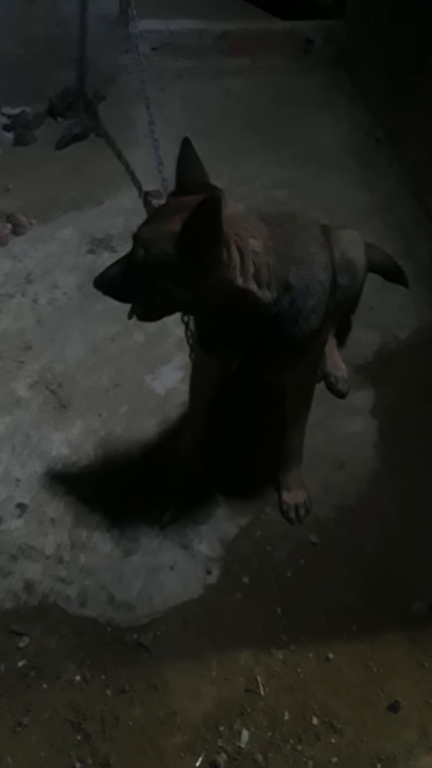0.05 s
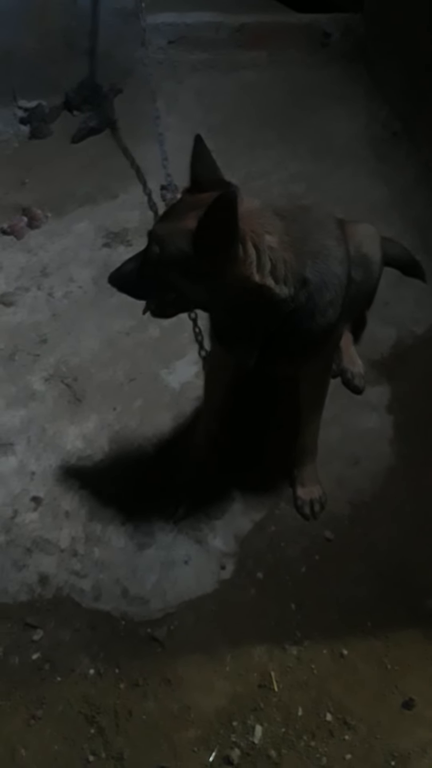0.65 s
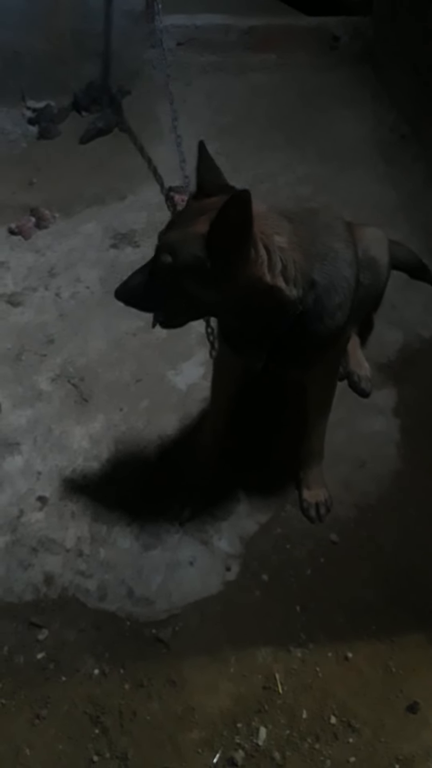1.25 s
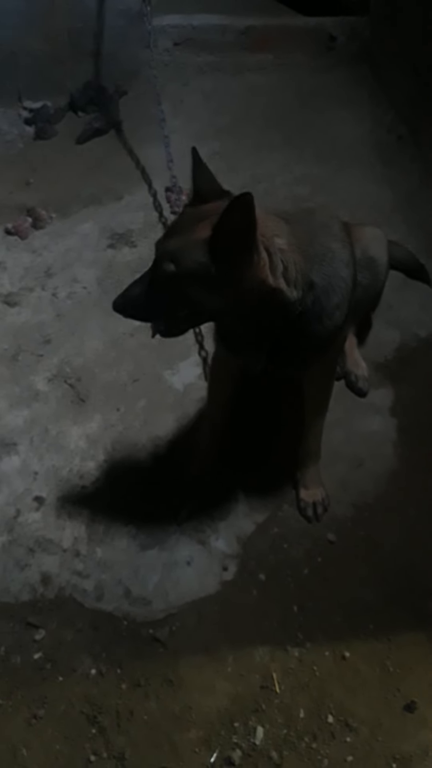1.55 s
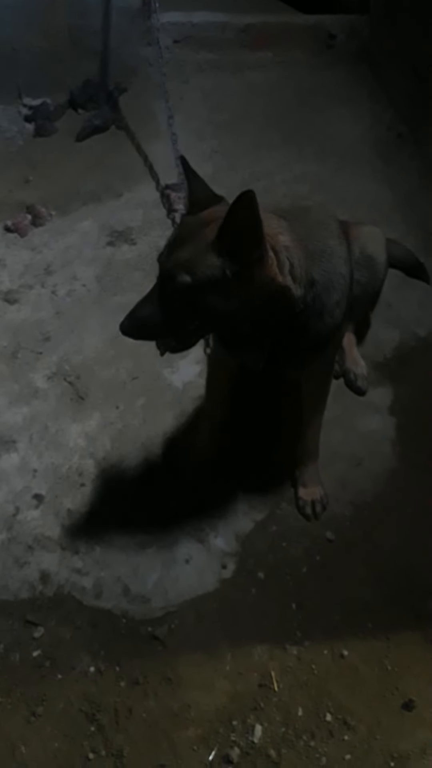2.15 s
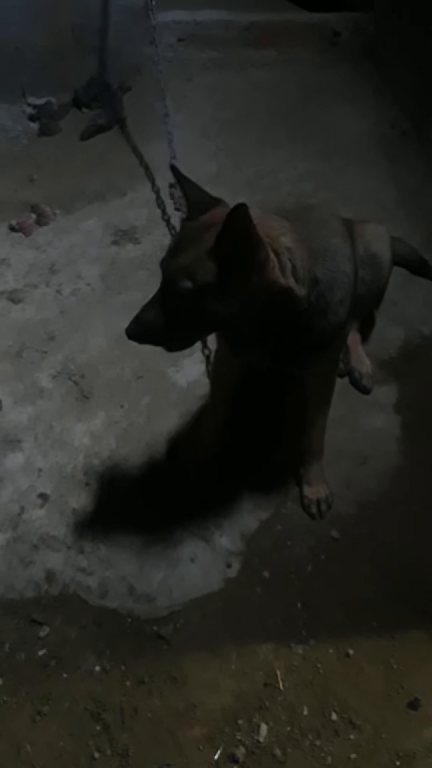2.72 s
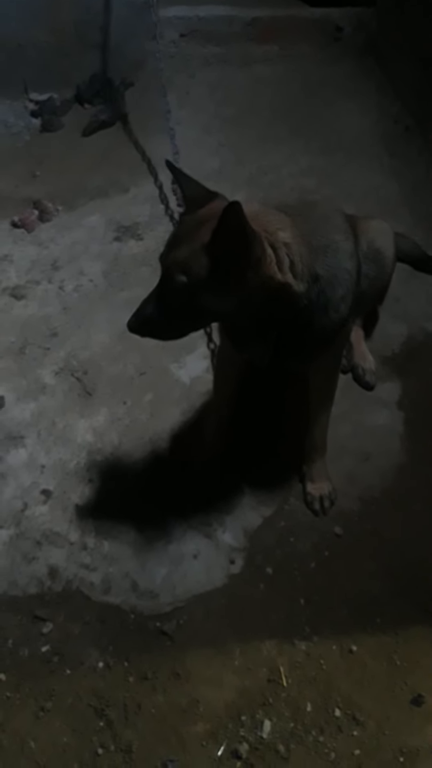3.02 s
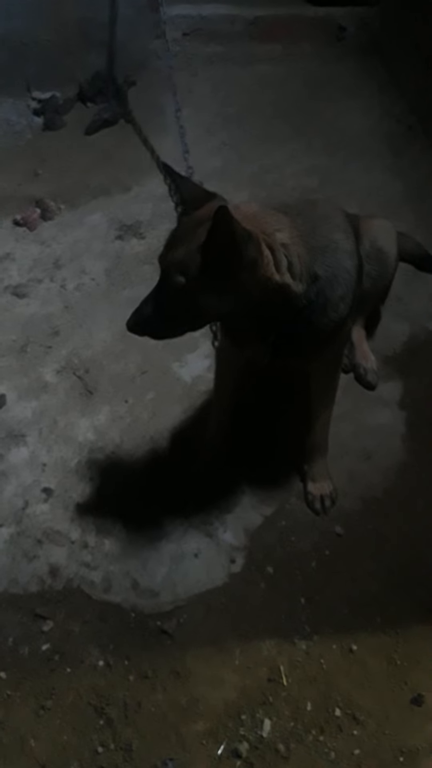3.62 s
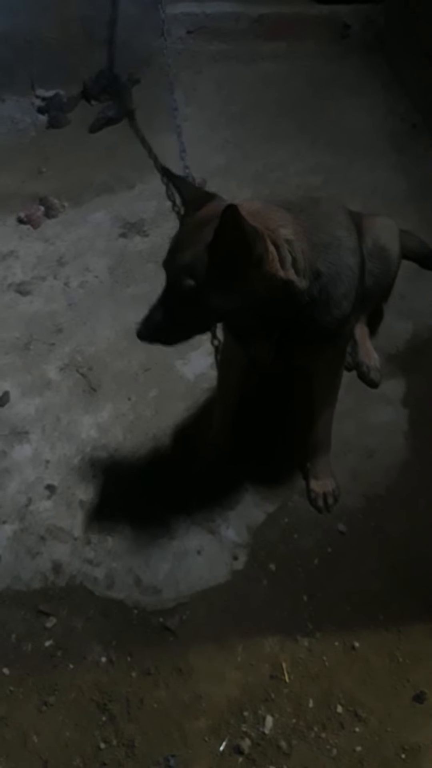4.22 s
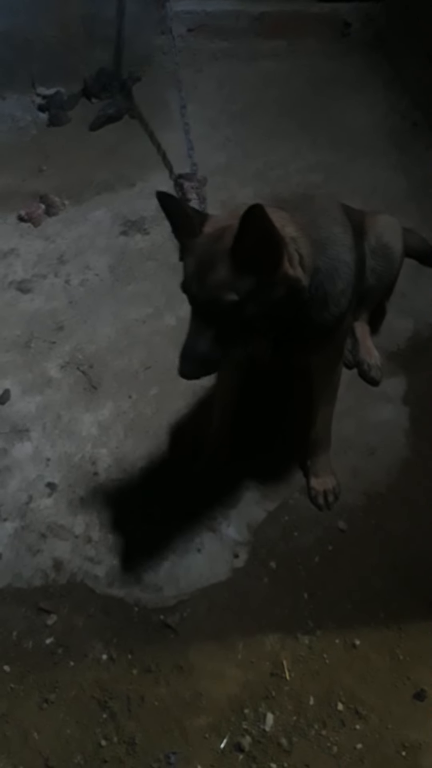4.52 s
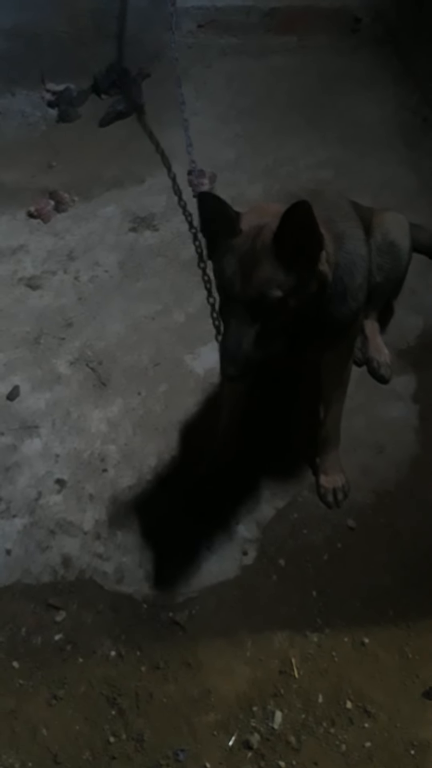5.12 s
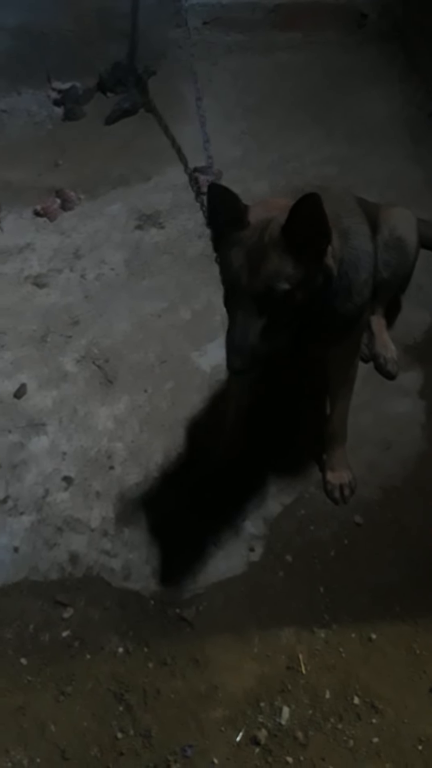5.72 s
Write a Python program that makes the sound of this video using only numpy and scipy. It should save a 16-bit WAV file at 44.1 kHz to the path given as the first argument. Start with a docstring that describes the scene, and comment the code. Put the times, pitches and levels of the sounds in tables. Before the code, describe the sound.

Six loud, hoarse dog barks mixed with low growls and snarls, then a light chain rattle and rustle, outdoors in still air.

```python
"""A chained dog barks twice, close by, in a walled yard at night; it pants softly and something rustles.
It growls with its mouth closed, then gives two more pairs of barks, each trailing into a snarl.
The voice is pulses of air from the vocal folds, shaped by the resonances of throat and mouth.
As the dog turns its head the chain clinks, the rustle returns with dry ticks, and a last growl rises.
Throughout, the walls reverberate briefly and a few hollow notes linger over still air."""
import sys
import numpy as np
from scipy import signal
from scipy.fft import rfft, irfft, next_fast_len
from scipy.io import wavfile
from scipy.ndimage import uniform_filter1d, minimum_filter1d, map_coordinates

SR = 44100
rng = np.random.default_rng(int(sys.argv[2]) if len(sys.argv) > 2 else 0)


def to_wav(sig):
    """Store sig (one row per channel, or 1-D mono) as 16-bit WAV at the path in sys.argv[1].

    Samples outside -1..1 are clipped; the rate is SR.
    """
    pcm = np.clip(np.atleast_2d(sig), -1, 1) * 32767
    pcm = np.round(pcm).astype(np.int16)
    wavfile.write(sys.argv[1], SR, pcm.T)  # frames by channels


N = 254456
TIME = np.arange(N) / SR

# The hoarse body of a bark. Each row: frequency in Hz, relative level in dB.
HOARSE_SPECTRUM = [(120, -44.5), (250, -28), (340, -2.5), (450, 3.5), (620, 2.5), (760, -9.5), (1100, -33),
                   (2000, -65.5)]
# The barks. Each row: time of full voice, attack, hold and release in seconds; top pitch in Hz; delay of
# that top, half width of the pitch arch and delay of the widest jaw in seconds; levels of fundamental,
# body, throat, mouth and hiss in dB; hiss treble and whistle in dB relative to the hiss; chest level
# in dB; roughness from 0 to 1; frequency factors of the throat and of the mouth.
BARK_EVENTS = [ (0.018, 0.044, 0.049, .115, 507.3, 0.026, .085, 0.058, -10.5, -19, -17, -17.5, -38.5, -3, -2.5, -45.5, 0.5, 1.032, 0.89),
               (0.612, 0.041, 0.042, .11, 592.4, .02, .042, 0.058, -14.5, -19, -14.5, -12, -33.5, 4, -11, -40.5, 0.82, 1.014, 0.92),
               (2.619, .05, 0.071, .1, 554.8, .042, 0.068, .06, -7.5, -15, -15, -13.5, -31, -0.5, -12, -38.5, 0.96, 1.072, 1),
               (2.882, .066, 0.055, .092, 593, .055, .058, .06, -10, -19, -16.5, -15.5, -30.5, -2.5, -5, -42, 0.9, 1.03, 0.94),
               (3.747, .036, 0.074, .088, 519.5, .055, .085, .054, -9, -22.5, -16.5, -16.5, -34, 3.5, -16, -42, 0.97, 1.015, 0.96),
               (4.081, 0.099, 0.024, 0.094, 515.8, .03, .04, 0.054, -26, -21.5, -21, -21.5, -42.5, -1.5, 2.5, -42, 0.81, 1.053, 0.98),
               ]
def barks():
    """Source and filter: the folds sound an arching pitch; effort and jaw opening weight each layer."""
    out = np.zeros(N)
    slack_hz, jaw_swing_s, hiss_lag_s, tone_fade_db_per_s = 417.9, .06, .0097, 34
    # for fundamental, body, throat, mouth and hiss: dB per dB of effort, and dB lost with the jaw shut
    slopes, losses_db = (1, .65, 1.2, 1, .95), (.5, .58, 1.7, 13, 16)
    for start, attack, hold, release, top_hz, crest, arch, widest, *voice in BARK_EVENTS:
        *peaks_db, treble_db, whistle_db, _, rough, throat_shift, mouth_shift = voice
        at, t, effort_db = swell(start, attack, hold, release)
        pitch = slack_hz + (top_hz - slack_hz) * np.exp(-np.abs((t - crest) / arch) ** 2.8)
        jaw_t = t - widest
        shut = 1 - .5 ** ((jaw_t / jaw_swing_s) ** 2)
        tone_db, body_db, throat_db, mouth_db, hiss_db = (
            db + slope * effort_db - loss * shut for db, slope, loss in zip(peaks_db, slopes, losses_db))
        tone_db -= tone_fade_db_per_s * np.maximum(t, 0)  # the clean tone gives way to hoarseness
        hiss_db = np.interp(t - hiss_lag_s, t, hiss_db)
        turns = cycles(pitch, jitter=.02, rate=240)
        out[at] += amp(tone_db) * fundamental(turns, flutter_db=3, rate=110)
        breath = folds(turns, rough=1, scatter_db=-.5, limp=0)
        out[at] += amp(body_db) * coloured(breath, HOARSE_SPECTRUM)
        out[at] += vocal_tract(turns, pitch, jaw_t, rough, (throat_shift, mouth_shift), (throat_db, mouth_db))
        out[at] += amp(hiss_db) * teeth_hiss(turns, jaw_t, throat_shift, hiss_db, treble_db, whistle_db)
    return out


# Resonances of throat and mouth in a bark. Each row: frequency in Hz, relative level in dB.
THROAT_FORMANTS = [(200, -49.5), (400, -15), (630, -8), (850, 5), (1040, -3.5), (1180, -15), (1500, -26.5),
                   (3000, -75.5)]
MOUTH_FORMANTS = [(600, -48.5), (1100, -12.5), (1270, -6.5), (1400, 3), (1700, 1), (1950, -1.5),
                  (2120, -17), (2360, -24.5), (2650, -35), (3050, -29), (3700, -40.5), (6000, -72)]
def vocal_tract(turns, pitch, jaw_t, rough, shifts, levels_db):
    """Formant filtering: throat and mouth shape clean overtones and air chopped by flapping tissue."""
    chopped = folds(turns, rough=.82, scatter_db=5.5, limp=.87) * amp(.69 * wobble(len(turns), 170))
    source = smeared(chopped, t60=.11, direct=.6)
    out = 0
    for formants, shift, db in zip((THROAT_FORMANTS, MOUTH_FORMANTS), shifts, levels_db):
        cavity = np.multiply(formants, [shift, 1])
        clear = overtones(turns, pitch, range(2, 5), cavity, flutter_db=7, rate=130)
        torn = sinking(source, cavity, jaw_t)
        out += amp(db) * (np.sqrt(rough) * torn + np.sqrt(1 - rough) * clear)
    return out


# Air rushing past the teeth. Each row: frequency in Hz, relative level in dB.
TEETH_SPECTRUM = [(2800, -45.5), (3750, -20.5), (4250, -0.5), (4800, 1), (5350, -5.5), (6000, -10.5),
                  (7400, -23.5), (9000, -38), (10500, -47.5), (15500, -45.5)]
def teeth_hiss(turns, jaw_t, shift, flow_db, treble_db, whistle_db):
    """Turbulence at the teeth: a hiss, brightest at the strongest flow, and an airy falling whistle."""
    n = len(turns)
    whistle_hz, sag_hz_per_s = 4880, 6000
    air = smeared(folds(turns, rough=.87, scatter_db=4.5, limp=.26), t60=.02, direct=.13)
    hiss = unit(coloured(air, np.multiply(TEETH_SPECTRUM, [shift, 1])) * amp(1.3 * wobble(n, 150)))
    dull = signal.sosfiltfilt(signal.butter(3, 6300, fs=SR, output="sos"), hiss)
    treble = amp(treble_db + .56 * (flow_db - flow_db.max())) * (hiss - dull)
    whistle = np.sin(2 * np.pi * cycles(whistle_hz - sag_hz_per_s * jaw_t, jitter=.042, rate=700))
    return dull + treble + amp(whistle_db) * unit(whistle * wobble(n, 300))


# The resonance of the chest. Each row: frequency in Hz, relative level in dB.
CHEST_SPECTRUM = [(30, -47.5), (75, -38.5), (110, -11.5), (160, -3.5), (230, -1), (330, -17), (700, -66)]
def chest():
    """Forced vibration: the chest shudders as each bark starts and ends, less under the full voice."""
    out = np.zeros(N)
    pitch_hz, edge_s, depth_db = 139.9, .04, 9.5
    for start, attack, hold, release, *_, db, _, _, _ in BARK_EVENTS:
        length = attack + hold + .88 * release
        at, t, edge_db = swell(start - attack, edge_s, length, edge_s)
        dip_db = depth_db * np.sin(np.pi * np.clip(t / length, 0, 1)) ** 2
        turns = cycles(np.full(len(at), pitch_hz), jitter=.14, rate=37)
        pulses = folds(turns, rough=.1, scatter_db=5, limp=.15)
        out[at] += amp(db + edge_db - dip_db) * coloured(pulses, CHEST_SPECTRUM)
    return out


# A snarl's clear overtones and its torn buzz. Each row: frequency in Hz, relative level in dB.
SNARL_HARMONICS = [(150, 25.5), (240, 2.5), (320, 3), (410, 4), (500, -3), (590, -11), (720, -1),
                   (820, -20), (930, -14), (1200, -38)]
SNARL_FORMANTS = [(90, -44.5), (160, 10.5), (250, -7.5), (420, 12), (590, -7), (720, -9), (930, -14),
                  (1250, -18), (1600, -14), (2150, -31), (2700, -37), (3800, -46.5), (4600, -29.5),
                  (5250, -30.5), (6000, -45), (9000, -59.5)]
# Open-mouth growls, one list each. Each row: time in seconds, pitch in Hz, relative levels of chest
# and throat in dB.
SNARL_PATHS = [
    [(3.02, 174.8, -47.5, -26.5), (3.048, 164.8, -36, -32), (3.09, 133.3, -42, -35),
     (3.168, 139.9, -44, -33.5), (3.244, 131.7, -44, -37.5), (3.302, 126.1, -56, -39),
     (3.35, 118.2, -51, -42), (3.385, 121.5, -66, -51.5)],
    [(4.2, 123.7, -70, -53), (4.24, 122.6, -73, -39.5), (4.38, 127.0, -59, -42.5),
     (4.46, 119.1, -59, -46.5), (4.796, 109.6, -57, -48.5), (4.928, 109.4, -61, -53.5),
     (4.96, 107, -52, -45.5), (5.03, 96.4, -79, -60)],
]
def snarls():
    """Irregular fold vibration: the voice sinks into a wavering growl, clear overtones over a buzz."""
    out = np.zeros(N)
    edge_s = .057
    for path in SNARL_PATHS:
        times, *columns = np.transpose(path)
        at, _, edge_db = swell(times[0], edge_s, times[-1] - times[0], edge_s)
        pitch, chest_db, throat_db = (np.interp(TIME[at], times, column) for column in columns)
        turns = cycles(pitch, jitter=.018, rate=140)
        hum = fundamental(turns, flutter_db=3.3, rate=31)
        clear = overtones(turns, pitch, range(2, 10), SNARL_HARMONICS, flutter_db=7, rate=18)
        buzz = folds(turns, rough=.45, scatter_db=4, limp=.3)
        torn = coloured(smeared(buzz, t60=.075, direct=.5), SNARL_FORMANTS)
        throat = .78 * clear + .62 * torn
        out[at] += amp(edge_db) * (amp(chest_db + .5) * hum + amp(throat_db + 3.24) * throat)
    return out


# The throat behind a closed mouth. Each row: frequency in Hz, relative level in dB.
RUMBLE_FORMANTS = [(60, -52.5), (110, -3), (160, 1.5), (250, -7), (360, 1), (490, -2.5), (580, -13.5),
                   (760, -9.5), (1050, -40), (1550, -17), (1850, -31), (2200, -34), (2800, -42.5),
                   (8000, -53.5)]
# Closed-mouth growls. Each row: start and length in seconds, pitch in Hz, rise in Hz per second,
# starting levels of chest, lower octave and throat in dB, growth of effort in dB per second.
RUMBLE_EVENTS = [(1.975, .58, 160.8, 48, -48.5, -56, -54, 6),
                 (5.425, .345, 165.3, 104.8, -44.5, -56.5, -51.5, 13.5)]
def rumbles():
    """Period doubling: the folds limp, adding a rough octave below a hum that rises and swells."""
    out = np.zeros(N)
    scoop_hz, scoop_s = 11, .05  # the growl slides up into its pitch
    for start, length, hz, rise, chest_db, octave_db, throat_db, growth in RUMBLE_EVENTS:
        at, t, edge_db = swell(start, attack=.11, hold=length, release=.064)
        n = len(at)
        pitch = hz + rise * t - scoop_hz * np.clip(-t / scoop_s, 0, 2) ** 2
        turns = cycles(pitch, jitter=.025, rate=140)
        hum = fundamental(turns, flutter_db=2.6, rate=55)
        octave = unit(np.sin(np.pi * turns + 1.2 * wobble(n, 40)) * amp(2.8 * wobble(n, 40)))
        buzz = smeared(folds(turns, rough=.2, scatter_db=4.5, limp=.5), t60=.2, direct=.5)
        effort_db = edge_db + growth * t
        out[at] += amp(effort_db) * (amp(chest_db) * hum + amp(octave_db) * octave)
        out[at] += amp(throat_db + 1.8 * effort_db) * coloured(buzz, RUMBLE_FORMANTS)
    return out


def cycles(pitch, jitter, rate):
    """Phase is the integral of frequency: the running count of cycles at an unsteady pitch."""
    return np.cumsum(pitch * (1 + jitter * wobble(len(pitch), rate))) / SR


def folds(turns, rough, scatter_db, limp):
    """Glottal source: a pulse and a puff of air each cycle; limp weakens every second pulse."""
    n = len(turns)
    closings = np.interp(np.arange(np.ceil(turns[0]), turns[-1]), turns, np.arange(n))
    sizes = amp(scatter_db * rng.uniform(-1.5, 1.5, 2048)[:len(closings)])
    sizes *= 1 + limp * (-1) ** np.arange(len(closings))
    taps = closings.astype(int)[:, None] + np.arange(-8, 9)
    shape = np.sinc(taps - closings[:, None]) * np.hanning(17)  # band-limited pulses
    pulses = np.bincount(np.clip(taps, 0, n - 1).ravel(), (sizes[:, None] * shape).ravel(), n)
    air = rng.standard_normal(N)[:n] * (1 + np.cos(2 * np.pi * turns)) ** 2
    return np.sqrt(1 - rough) * unit(pulses - pulses.mean()) + np.sqrt(rough) * unit(air)


def fundamental(turns, flutter_db, rate):
    """Amplitude modulation: the first harmonic flutters in level; rms 1."""
    return unit(np.sin(2 * np.pi * turns) * amp(flutter_db * wobble(len(turns), rate)))


def overtones(turns, pitch, orders, spectrum, flutter_db, rate):
    """Harmonic series: multiples of the pitch, each fluttering on its own; rms 1."""
    out = 0
    for k in orders:
        level_db = along(spectrum, k * pitch) + flutter_db * wobble(len(turns), rate)
        out += amp(level_db) * np.sin(2 * np.pi * (k * turns + rng.random()))
    return unit(out)


def sinking(x, cavity, t, shift=.026, glide_s=.097):
    """Formant shift: a cavity's resonances cross-fade from high to low as t passes zero."""
    late = np.clip(.5 + t / glide_s, 0, 1)
    high, low = (coloured(x, np.multiply(cavity, [1 + way * shift, 1])) for way in (1, -1))
    return unit((1 - late) * high + late * low)


# Link scraping on link. Each row: frequency in Hz, relative level in dB.
SCRAPE_SPECTRUM = [(100, -30.5), (600, -6), (1300, 20.5), (2000, -10), (2600, 4), (4500, 2), (6200, 7.5),
                   (9000, -18.5), (15500, -19)]
# Chain contacts. Each row: start in seconds, relative levels of scratch and ring in dB.
CHAIN_CONTACTS = [(4.6962, -37.5, -32.5), (4.7074, -45, -31.5), (4.7433, -38.5, -50), (4.814, -46, -57),
                  (4.8812, -34, -41.5), (4.9025, -35.5, -48), (4.942, -38.5, -49), (4.9582, -41, -71),
                  (5.0479, -38, -52.5)]
def chain():
    """Impact excitation: each contact makes a short scratch and sets a link ringing."""
    out, t = np.zeros(N + SR), np.arange(SR // 4) / SR
    onset = 1 - np.exp(-t / .003)
    for start, scratch_db, ring_db in CHAIN_CONTACTS:
        scratch = amp(scratch_db - 8) * burst(t, SCRAPE_SPECTRUM, t60=.04)
        ring = amp(ring_db + 8) * link_ring(t)
        out[round(start * SR):][:len(t)] += (scratch + ring) * onset
    return out[:N]


# Modes of a link. Each row: frequency in Hz, relative level in dB, time to fall 60 dB in seconds.
LINK_MODES = [(1563, -8, 0.038), (1794, 1, 0.045), (1850, -17.5, 0.23), (2937, -28, 0.074),
              (4520, -21, 0.06), (6400, -35, 0.034)]
def link_ring(t):
    """Free vibration: damped modes, their tuning and strengths varying from link to link; peak 1."""
    tuning = 1 + .02 * rng.standard_normal()
    ring = sum(amp(db + rng.normal(0, 2.95) - 60 * t / t60) * np.sin(2 * np.pi * hz * tuning * t)
               for hz, db, t60 in LINK_MODES)
    return ring / np.abs(ring).max()


# A bright tick and a dull knock. Each row: frequency in Hz, relative level in dB.
TICK_SPECTRUM = [(800, -15.5), (2500, -19), (4500, -6), (6200, 9), (9000, -8), (12000, -11), (15500, -8)]
KNOCK_SPECTRUM = [(40, -27), (130, 4), (600, 5.5), (1200, -19), (2500, -5), (6000, -31.5)]
# Ticks in the rustle. Each row: start in seconds, relative levels of tick and knock in dB.
TICK_EVENTS = [(1.39, -55, -89), (1.51, -59.5, -86.5), (5.1143, -29, -66), (5.1315, -34, -76),
               (5.1756, -38, -69), (5.243, -31.5, -60.5)]
def ticks():
    """Damped transients: dry, bright ticks, each over a faint dull knock."""
    out, t = np.zeros(N + SR), np.arange(SR // 4) / SR
    for start, tick_db, knock_db in TICK_EVENTS:
        tick = amp(tick_db - 15) * burst(t, TICK_SPECTRUM, t60=.045)
        knock = amp(knock_db + 9) * burst(t, KNOCK_SPECTRUM, t60=.063)
        out[round(start * SR):][:len(t)] += tick + knock
    return out[:N]


# Dull puffs of air. Each row: frequency in Hz, relative level in dB.
PANT_SPECTRUM = [(300, -29), (700, -5.5), (1000, -6), (1450, 2.5), (1750, 0), (1950, -11.5), (2200, -8.5),
                 (2600, -17), (3100, -7), (3700, -13.5), (6000, -33)]
# The puffs. Each row: time of full strength, attack, hold and release in seconds, relative level in dB.
PANT_STROKES = [(.2, 0.13, 0.11, .2, -73.5), (.35, .06, 0.025, 0.27, -71), (.76, .06, 0.017, 0.11, -58),
                (1.06, .12, 0.037, 0.082, -81.5), (3.44, .1, 0.11, 0.23, -82)]
def panting():
    """Turbulent airflow: soft, dull puffs of air, like the dog panting between barks."""
    return amp(10) * noise_strokes(PANT_STROKES, PANT_SPECTRUM, grain_db=3.5)


# Bright rubbing. Each row: frequency in Hz, relative level in dB.
RUSTLE_SPECTRUM = [(800, -22), (1600, -10), (2400, -26.5), (3100, -17), (4600, -9.5), (5900, 1.5),
                   (7500, -6.5), (9000, -12), (10500, -25.5), (12200, -18), (15500, -22.5)]
# Its strokes. Each row: time of full strength, attack, hold and release in seconds, level in dB.
RUSTLE_STROKES = [(.22, 0.089, 0.33, 0.18, -68), (.36, .05, 0.025, .12, -60.5), (.8, .1, 0.12, 0.31, -70),
                  (4.46, .08, 0.99, .2, -70.5), (4.89, .02, .02, .14, -63.5), (5.11, .05, 0.4, 0.45, -58.5)]
def rustle():
    """Sliding friction: a soft, bright rubbing comes and goes."""
    return noise_strokes(RUSTLE_STROKES, RUSTLE_SPECTRUM, grain_db=3)


def noise_strokes(strokes, spectrum, grain_db):
    """Modulated noise: fast random changes of level make each stroke grainy."""
    out = np.zeros(N)
    for *shape, db in strokes:
        at, _, edge_db = swell(*shape)
        grains = rng.standard_normal(N)[:len(at)] * amp(grain_db * wobble(len(at), 240))
        out[at] += amp(db + edge_db) * coloured(grains, spectrum)
    return out


def smeared(x, t60, direct):
    """Scattering: ground and near walls blur the pulses into one another."""
    t = np.arange(SR // 6) / SR
    scatter = rng.standard_normal(len(t)) * amp(-60 * t / t60)
    scatter /= np.linalg.norm(scatter)
    scatter[0] += direct
    return unit(signal.fftconvolve(x, scatter)[:len(x)])


# The yard's diffuse decay. Each row: frequency in Hz, reverberation time in seconds.
YARD_DECAY = [(100, .7), (500, 0.39), (1500, 0.36), (3000, 0.19), (6000, 0.25), (12000, 0.22)]
# Its hollow notes. Each row: frequency in Hz, time to fall 60 dB in seconds, relative gain in dB.
YARD_MODES = [(206, 3.5, -17.5), (527, 2.5, -20.5), (531, 0.88, -16.5), (514.8, 2.4, -21), (571, 0.35, -13),
              (643, 3.1, -21), (650, 2.5, -21)]
def yard(x, wet_db, hollow_db):
    """Reverberation: the walls answer with a diffuse tail and a few slowly dying resonances."""
    hz, t, noise = signal.stft(rng.standard_normal(SR), SR, nperseg=256)
    tail = signal.istft(noise * amp(-60 * t / along(YARD_DECAY, hz)[:, None]), SR, nperseg=256)[1]
    tail[:round(.008 * SR)] = 0  # the gap before the first reflection
    echo = signal.fftconvolve(x, tail / np.linalg.norm(tail))[:N]
    notes = np.zeros(N)
    for mode_hz, t60, db in YARD_MODES:
        drift = 1.5 * wobble(N, 30)  # each note is a cluster, so its phase wanders
        resonant_gain = t60 * SR / (2 * np.log(1000))
        notes += amp(db - 60 * TIME / t60) * np.sin(2 * np.pi * mode_hz * TIME + drift) / resonant_gain
    return amp(wet_db) * echo + amp(hollow_db) * signal.fftconvolve(x, notes)[:N]


# Still night air. Each row: frequency in Hz, relative level in dB.
NIGHT_SPECTRUM = [(25, -13), (60, -7.5), (110, 1.5), (250, -2.5), (550, -9), (900, -12), (1500, -14.5),
                  (2500, -22.5), (6000, -15.5), (9000, -28), (15500, -33)]
def night_air(db):
    """Stationary noise: a faint, low hush."""
    return amp(db) * coloured(rng.standard_normal(N), NIGHT_SPECTRUM)


def amp(db):
    """Decibels to gain."""
    return 10 ** (np.asarray(db) / 20)


def unit(x):
    """Scale to rms 1."""
    return x / np.sqrt(np.mean(x ** 2) + 1e-20)


def along(points, hz):
    """Interpolate (Hz, value) points on a log frequency axis."""
    freqs, values = np.transpose(points)
    return np.interp(np.log(hz + 1), np.log(freqs), values)


def wobble(n, rate):
    """Random modulation: a smooth curve with rate knots a second."""
    return map_coordinates(rng.standard_normal(8192), [np.arange(n) * rate / SR + 2], mode="wrap")


def coloured(x, spectrum, size=4096):
    """Minimum-phase filtering of x by the given spectrum; rms 1."""
    cepstrum = irfft(np.log(amp(along(spectrum, np.fft.rfftfreq(size, 1 / SR)))))
    causal = np.r_[1, np.full(size // 2 - 1, 2), np.zeros(size // 2)]
    response = irfft(np.exp(rfft(cepstrum * causal)))
    return unit(signal.fftconvolve(x, response)[:len(x)])


def burst(t, spectrum, t60):
    """Exponential decay: coloured noise falls 60 dB in t60 seconds."""
    return coloured(rng.standard_normal(len(t)), spectrum) * amp(-60 * t / t60)


def swell(start, attack, hold, release, depth_db=27.5, curve=1.54):
    """Envelope of one event: its samples, their time from reaching full strength, and its level in dB."""
    at = np.flatnonzero((TIME > start - 2 * attack) & (TIME < start + hold + 2 * release))
    t = TIME[at] - start
    away = np.maximum(-t / attack, 0) + np.maximum((t - hold) / release, 0)
    return at, t, -depth_db * away ** curve


def scene():
    """Superposition: the direct sound of dog and chain, the yard's answer and the night air."""
    near = barks() + chest() + rumbles() + snarls() + chain() + rustle() + panting() + ticks()
    air = night_air(db=-72)
    return (near + yard(near, wet_db=-19.5, hollow_db=6.5) + air)[None]


def record(dry):
    """Band and peak limiting: deep bass is shed, a smooth gain holds peaks down, the top treble is cut."""
    low_cut_hz, top_hz = 75, 15750
    thinned = signal.sosfilt(signal.butter(4, low_cut_hz, "highpass", fs=SR, output="sos"), dry)
    needed = 1 / np.maximum(np.abs(thinned), 1)
    held = minimum_filter1d(needed, size=257)
    gain = uniform_filter1d(uniform_filter1d(held, size=129), size=129)
    size = next_fast_len(N + 8192)
    passband = np.fft.rfftfreq(size, 1 / SR) < top_hz
    return irfft(rfft(thinned * gain, size) * passband, size)[:, :N]


dry = scene()
out = record(dry)
to_wav(out)
```